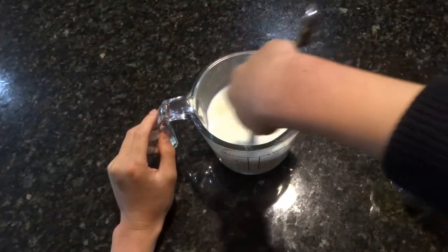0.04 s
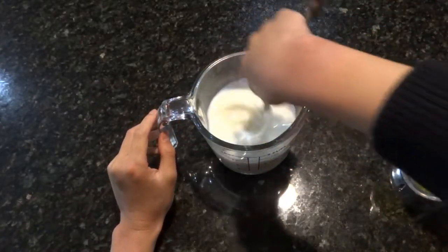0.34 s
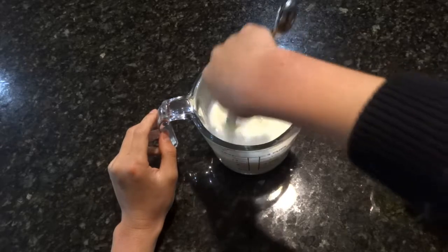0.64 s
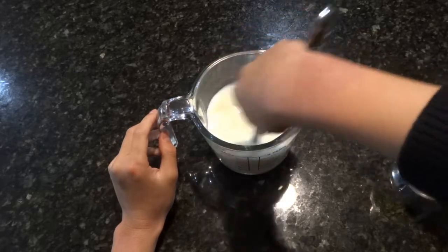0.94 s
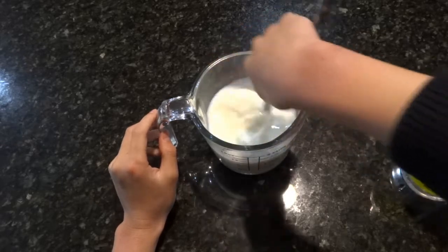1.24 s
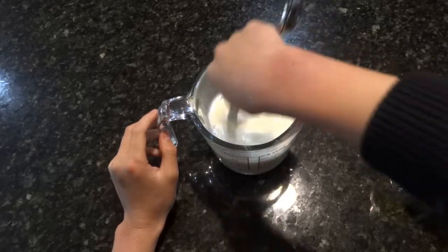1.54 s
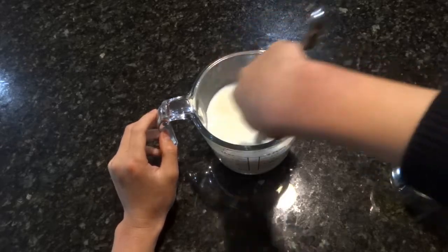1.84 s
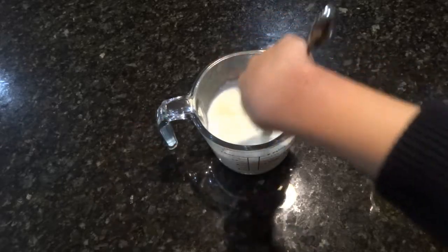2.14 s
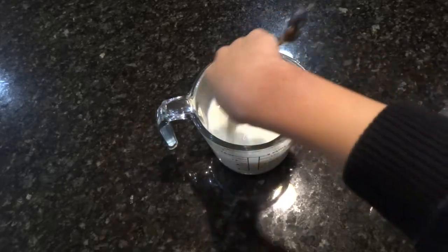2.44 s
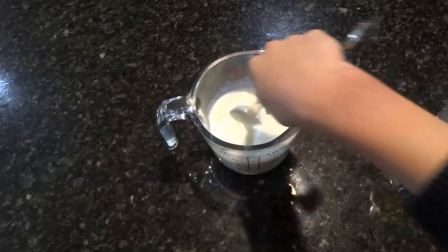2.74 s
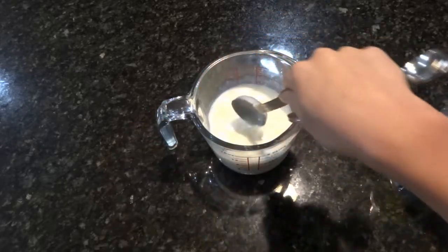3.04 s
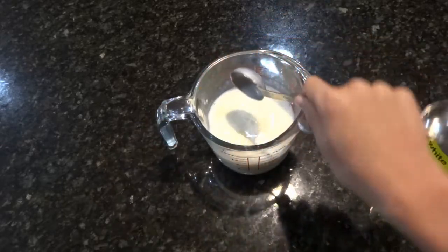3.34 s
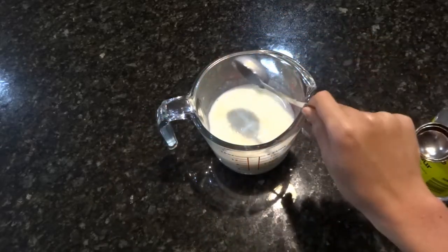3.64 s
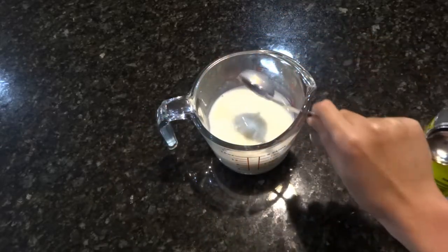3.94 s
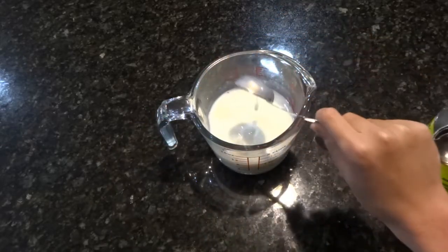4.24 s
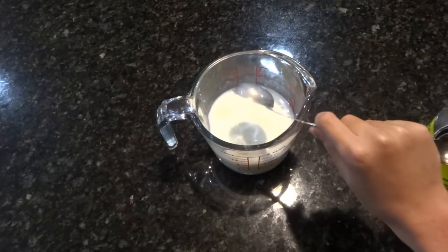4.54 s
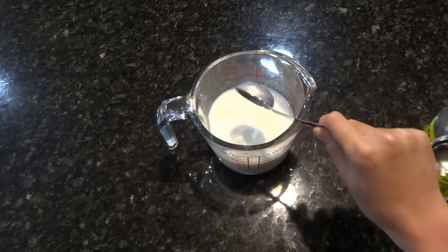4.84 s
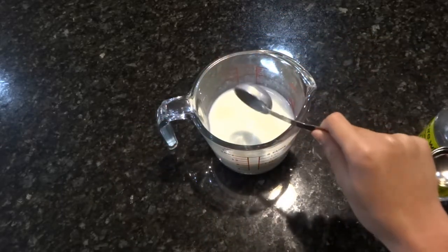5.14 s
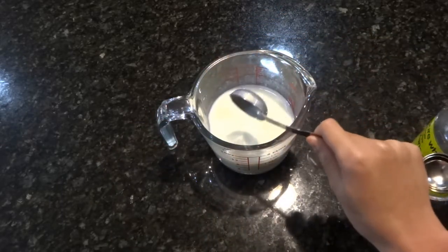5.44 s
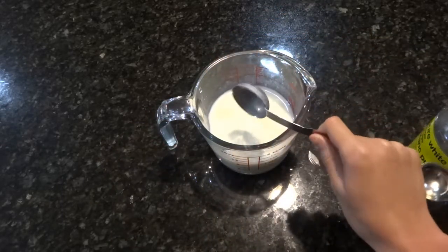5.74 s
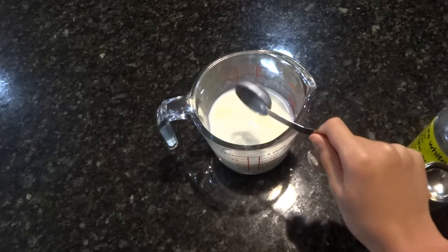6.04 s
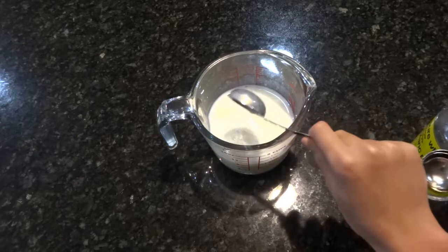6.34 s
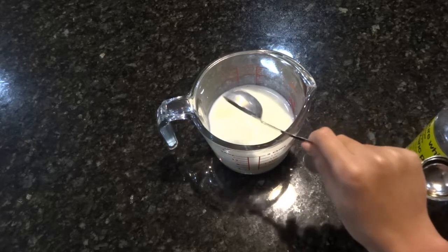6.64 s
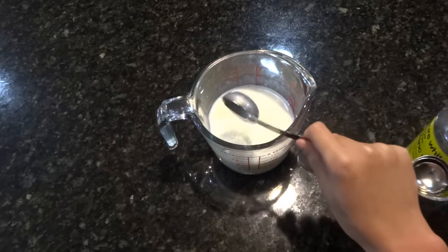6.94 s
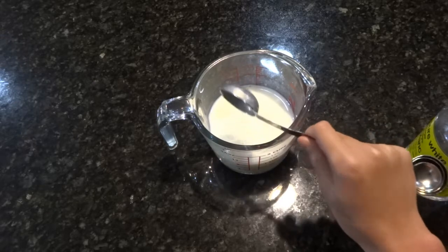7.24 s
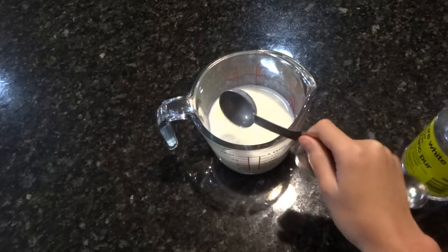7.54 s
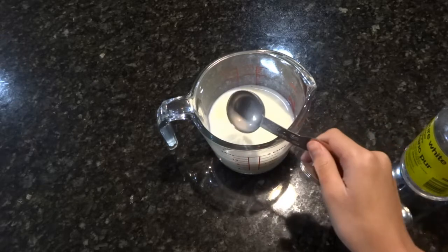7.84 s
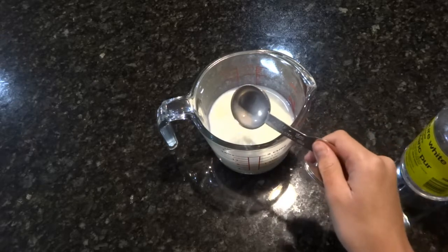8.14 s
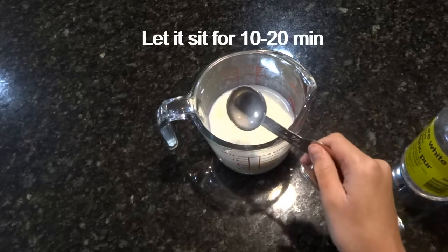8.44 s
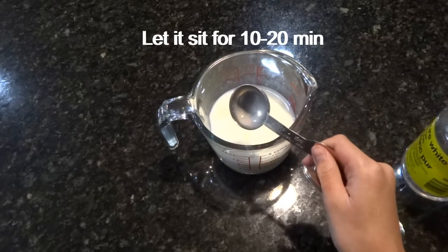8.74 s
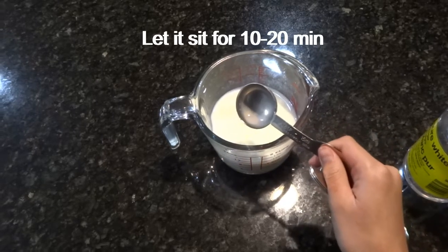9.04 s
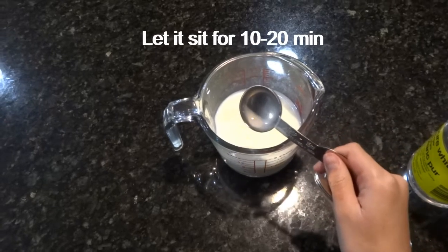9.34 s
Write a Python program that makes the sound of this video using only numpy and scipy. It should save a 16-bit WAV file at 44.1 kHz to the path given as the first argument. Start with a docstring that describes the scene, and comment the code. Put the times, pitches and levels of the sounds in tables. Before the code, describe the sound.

A steel spoon stirs milk in a glass jug, scraping round the wall with clinks, small squeaks and a soft churning of liquid. The stirring stops, and after a short pause the spoon is tapped on the rim about five times a second, each tap a knock with a bright ring. A sleeve rustles faintly and something bumps the counter. The sounds are close, with a short kitchen echo and a faint hum.

```python
"""Stirring milk, tapping the spoon

A steel spoon stirs milk in a glass jug on a stone kitchen counter. Each turn is a sweep, a clink and
a drag back along the wall. Then the spoon is tapped on the rim about five times a second, the point of
contact creeping along it: the steel rings, the jug knocks and the kitchen echoes. A sleeve rustles
and something bumps the counter. A limiter (a fast volume control) flattens the loud blows."""
import sys
import numpy as np
from scipy import signal
from scipy.fft import rfft, irfft
from scipy.io import wavfile
from scipy.ndimage import uniform_filter1d, map_coordinates

SR = 44100
rng = np.random.default_rng(int(sys.argv[2]) if len(sys.argv) > 2 else 0)


def to_wav(s):
    """Save 16-bit WAV."""
    ch = np.atleast_2d(s).T  # columns
    pcm = np.round(np.clip(ch, -1, 1) * 32767)  # PCM
    wavfile.write(sys.argv[1], SR, pcm.astype(np.int16))


N = 418950
T = np.arange(30000) / SR  # seconds since the start of one blow
BLOW_S = .14

# Levels compare the rows of one table. A fade_s is the time taken to die away by 60 dB.
# The kitchen's echo: pitch_hz, fade_s
ECHO_FADE = [(150, 0.98), (700, 0.4), (1200, 0.38), (3000, 0.32), (7000, 0.29), (14000, 0.22)]
# Tone of the room's soft hiss: pitch_hz, level_db
AIR_TONE = [(15, -50), (25, -53.5), (48, -5.5), (97, -12.5), (123, -7.5), (185, 1), (439, -8), (560, -11.5),
            (796, -20), (4610, -27.5), (5880, -36), (6560, -30.5), (8140, -33.5), (13600, -33),
            (16000, -35.5)]
# An appliance hums: pitch_hz, level_db
HUM_NOTES = [(140.0, -61), (242.2, -61), (269.2, -68)]
# A low drone fades: time_s, pitch_hz, level_db
DRONE_PATH = [(0, 76.5, -59), (.65, 71.24, -54.5), (.85, 63.8, -63), (1.2, 57.2, -54), (1.6, 58.1, -58.5),
              (2.401, 57.7, -69.5)]

# The spoon sweeps the bottom, pushing milk ahead of it: start_s, length_s, level_db
SWEEPS = [(0, 0.014, -41), (.345, 0.11, -34), (0.811, 0.087, -33.5), (1.246, 0.11, -35), (1.71, 0.092, -34),
          (2.045, 0.11, -36.5), (2.319, 0.091, -47.5)]
# It drags back along the wall: start_s, length_s, level_db
DRAGS = [(.14, 0.074, -34), (0.593, 0.074, -38), (1.069, .045, -35), (1.47, 0.05, -36.5)]
# Tone of steel scraping glass: pitch_hz, level_db
GRIT_TONE = [(1000, -38), (1800, 3.5), (2600, -12.5), (3600, 10.5), (4400, -1.5), (5800, -6.5),
             (6650, 11.5), (7500, -2.5), (9300, -11.5), (10600, 7.5), (11800, -14.5), (14000, 2),
             (15500, -15)]
# Tone of churning milk: pitch_hz, level_db
CHURN_TONE = [(150, -24.5), (280, -7), (480, -9.5), (630, 2), (760, -5.5), (930, 0), (1300, -5),
              (1800, -9.5), (2600, -11.5), (4000, -40.5)]
# Notes of the glass wall, damped by milk and hand: pitch_hz, level_db, fade_s
WALL_NOTES = [(2990, -12, .1), (3110, -8, .11), (3285, -2, .12), (3597, -1.5, .2), (3960, -12, .12),
              (4280, -8, .14), (4420, -9, .12), (4510, -6, .15), (5375, -13, .16), (6380, -11, .1),
              (8190, -11, .1), (10350, -19, .15)]
# The sunk spoon hits the wall: start_s, level_db, ring_db (compared with the rattle)
CLINKS = [(0.028, -31, 0.5), (.164, -32.5, -8.5), (0.487, -32.5, -1), (.624, -34.5, -8), (0.931, -28, 0.5),
          (1.0663, -32, -8), (1.394, -31.5, 0), (1.51, -34.5, -12), (1.852, -29.5, -12),
          (2.2374, -30.5, -10.5)]
# Tone of a clink's rattle: pitch_hz, level_db
CLINK_TONE = [(100, -17), (450, -11.5), (620, -6.5), (950, 0), (1500, -0.5), (2700, -7.5), (3200, -7),
              (4500, 2.5), (4900, -7.5), (6400, 4.5), (7500, -4), (9000, -5), (13500, -8), (15500, -31)]
# Steel squeaks on glass: start_s, length_s, start_hz, end_hz, level_db, roughness (0-1)
SQUEAKS = [(.13, 0.041, 4000, 4120, -36.5, 0.6), (.135, 0.018, 5200, 4900, -42, .8),
           (.59, 0.03, 3940, 4140, -33.5, 0.5), (.64, 0.047, 4460, 4600, -39, 0.2),
           (.938, 0.056, 3605, 3605, -22, 0), (1.088, 0.023, 4570, 4600, -31, 0.13),
           (1.21, 0.075, 2490, 2810, -36.5, 0.4), (1.478, 0.0246, 4130, 4330, -30.5, 0.8),
           (1.478, .03, 10950, 10550, -32, 1), (1.854, 0.042, 3597, 3625, -22, 0),
           (2.05, 0.024, 4470, 4270, -24, 1), (2.07, 0.13, 3400, 3030, -42.5, 0.8),
           (2.36, 0.048, 4010, 4270, -49, 0.42)]
# The spoon shifts: start_s, level_db, centre_hz
TICKS = [(.225, -43.5, 4900), (1.129, -46.5, 8000), (2.45, -57.5, 3500), (3.844, -57, 450),
         (7.644, -64, 9000), (7.753, -62.5, 7000), (7.819, -56.5, 2600), (7.898, -63.5, 2200),
         (8.419, -61.5, 7000), (9.093, -52, 3500)]
# Tone of such a tick, centred on 1000 Hz: pitch_hz, level_db
SHIFT_TONE = [(150, -7), (500, -2.5), (1000, 1), (3000, -13), (8000, -49.5)]
# Air pockets in the milk: start_s, length_s, start_hz, end_hz, level_db, roughness (0-1)
GULPS = [(.40, 0.048, 1680, 1915, -41.5, 0.35), (.966, 0.023, 1410, 2100, -42, 0.2),
         (1.0, 0.018, 960, 1040, -34, 0), (1.845, 0.062, 964, 998, -26.5, 0.4),
         (2.07, 0.093, 903, 914, -42, 0.47)]

# Taps on the rim: start_s, level_db, place (0-1 along the spoon), bite_db (how sharply its edge lands)
TAPS = [(3.3967, -32.5, 0, -1), (3.885, -27, 0, 3), (4.0805, -22, 0.09, -8.5), (4.268, -22.5, 0.18, 3.5),
        (4.434, -22, 0.08, -2), (4.6158, -21, 0.08, 1.5), (4.785, -29.5, .41, 4),
        (4.9667, -25.5, 0.46, 11.5), (5.162, -26, .39, 9), (5.3059, -30, 0.45, -3),
        (5.4844, -30.5, 0.47, 3), (5.6723, -29.5, .53, -4), (5.87, -31.5, 0.63, -4), (6.0705, -21, .5, 3),
        (6.2776, -19.5, 0.7, -0.5), (6.4864, -19, 0.75, -8.5), (6.6824, -21.5, 0.76, -8.5),
        (6.8979, -21, 0.79, -1), (7.1043, -23, 0.8, 7), (7.2938, -21, 1, 3.5)]
# Notes of spoon and jug, in families that ring together; each note: pitch_hz, level_db, fade_s
RING_FAMILIES = [
    [(2040, -14, .33), (2326, -9, .5), (2475, -9, .3), (2435, -4, .52), (2616, -17, .36), (2930, -16, .45)],
    [(3327, -0.5, .45), (3345, -9, .3), (4281, -10, .38), (5393, -8, .5)],
    [(3594, -9, .3), (3651, -1.5, .5), (3675, -12, .27)],
    [(6444, -13, .2), (6685, -11, .25), (6746, -5, .3), (7424, -9, .25), (7480, -7, .18)],
    [(6132, -10.5, .18), (7014, -8, .24), (7138, -15, .2), (8054, -9, .27), (8748, -18, .28),
     (9426, -17, .2), (9793, -5, .22), (10853, -9, .15)],
    [(9950, -14, .17), (10080, -8, .17), (11243, -4, .18), (12042, -19, .25), (12830, -14, .16),
     (13110, -17, .13)],
]
# How each family answers a tap: level_db, loudest_place, spacing (of loud places along the spoon),
# dip_db (between them), db_per_blow_db, db_per_bite_db
FAMILY_RESPONSE = [(-3, 0.843, .47, 16, .38, 0), (-7, 0.65, 1, 8, 0.25, 0), (-2, 0.21, 1.28, 20, -0.5, 0),
                   (-1.1, 0.5, 1.48, 14, -0.45, 0), (4, 0.99, 1.34, 24.5, -0.72, 0),
                   (-4.5, 1.03, 1.71, 9.5, 1.04, 1)]
# Tone of the jug's dull knock, centred on 1000 Hz: pitch_hz, level_db
KNOCK_TONE = [(60, -38), (240, -17.5), (495, -22), (630, -2.8), (950, -3.5), (1250, 0), (1600, -5.5),
              (2300, -9), (2900, -17), (4200, -19.5), (5600, -28), (6900, -40.5), (9000, -27),
              (14000, -42.5)]
# Notes of the kitchen itself, woken by a knock: pitch_hz, level_db, fade_s
ROOM_NOTES = [(240, -24.5, .6), (712, -12.5, .8), (768, -15, .6), (832, -11, .42), (884, -7, .38),
              (1025, -10, .33), (1102, -14, .3), (1164, -9, .33), (1244, -12, .36)]
# Tone of the bright tick that starts a tap: pitch_hz, level_db
TAP_TONE = [(1000, -11), (2500, -2.5), (3500, -8), (5200, -20), (7000, 10), (8800, 1), (11000, 4),
            (13500, -4), (15500, -16)]

# Sleeve and hand shift: time_s, level_db
RUSTLE_PATH = [(7.45, -59), (7.6, -52.5), (7.8, -54.5), (7.92, -56.5), (8.05, -81)]
# Tone of cloth: pitch_hz, level_db
CLOTH_TONE = [(200, -8), (800, 1.5), (2000, -2.5), (4000, -12), (10000, -12.5), (15000, -22.5)]
# Tone of the bump on the counter: pitch_hz, level_db
BUMP_TONE = [(30, -11), (70, -3), (300, -1), (550, -3.5), (850, -5.5), (1400, -12), (2200, -3), (2800, -19),
             (4000, -15), (6000, -42)]
# Boost or cut of the difference between left and right: pitch_hz, gain_db
STEREO_WIDTH = [(30, -8.5), (125, -8), (300, -2.5), (700, 7), (3000, 5.5), (8000, 0.5), (12000, -10.5)]

STIR_END_S, SETTLE_S = 2.36, .1  # the stirring stops, then the milk settles


def amp(db):
    """Turns decibels into a multiplier."""
    return 10 ** (np.asarray(db) / 20)


def unit(x):
    """Scales a sound to an average power of 1."""
    return x / np.sqrt(np.mean(abs(x) ** 2) + 1e-20)


def blow(x):
    """Gives a short sound the energy of power 1 held for BLOW_S."""
    return unit(x) * np.sqrt(BLOW_S * SR / x.shape[-1])


def look_up(points, hz):
    """Reads a table's value at any pitch, filling in between its rows."""
    pitch_hz, value = np.transpose(points)
    return np.interp(np.log(hz + 1), np.log(pitch_hz + 1), value)


def add(mix, start_s, sound):
    """Mixes a sound in at the given time."""
    part = mix[..., round(start_s * SR):][..., :sound.shape[-1]]
    part += sound[..., :part.shape[-1]]


def convolve(x, response):
    """Passes a sound through an echo or filter, keeping its length."""
    return signal.fftconvolve(np.atleast_2d(x), np.atleast_2d(response), axes=1)[:, :x.shape[-1]]


def colour(x, tone, shift=1, size=2048):
    """Filters a sound by a tone table whose pitches are multiplied by shift."""
    log_gain = np.log(amp(look_up(tone, abs(np.fft.fftfreq(size, 1 / SR)) / shift)))
    spectrum = np.exp(np.conj(signal.hilbert(log_gain)))  # nothing rings ahead of the sound
    return convolve(x, np.fft.ifft(spectrum).real[:size // 2])


def wander(size, hz):
    """A smooth random wobble, up to about hz times a second."""
    rolloff = 1 + (np.fft.rfftfreq(size, 1 / SR) / hz) ** 4
    return unit(irfft(rfft(rng.standard_normal(size)) / rolloff, size))


def contact(decay_s):
    """Hard surfaces chatter briefly when they meet."""
    return rng.choice([-1., 1.], len(T)) * np.exp(-T / decay_s)


def kitchen(echo_db, early=.91, ceiling_s=.018, side=.16):
    """A click in the room: direct sound, weaker early echoes, then a wash from ceiling and walls."""
    mid, apart = rng.standard_normal((2, len(T)))
    hz, t, spectra = signal.stft([mid + side * apart, mid - side * apart], SR, nperseg=256)
    fade = amp(-60 * t / look_up(ECHO_FADE, hz)[:, None])
    echo = signal.istft(spectra * fade, SR, nperseg=256)[1][:, :len(T)]
    echo *= np.where(T < ceiling_s, early, 1) * (T > .002)
    echo *= amp(echo_db) / np.linalg.norm(echo[0])
    echo[:, 0] += 1
    return echo


def room_tone(air_db=-54.5, side=.4, hum_db=-3):
    """Soft air noise, an appliance's hum and a fading low drone."""
    t = np.arange(N) / SR
    mid, apart = unit(colour(rng.standard_normal((2, N)), AIR_TONE, size=8192))
    air = amp(air_db) * np.array([mid + side * apart, mid - side * apart])
    hum = sum(amp(db + hum_db) * np.sin(2 * np.pi * hz * t + .23 * wander(N, hz=3.2))
              for hz, db in HUM_NOTES)
    s, hz, db = np.transpose(DRONE_PATH)
    phase = 2 * np.pi * np.cumsum(np.interp(t, s, hz)) / SR
    drone = amp(np.interp(t, s, db)) * np.sin(phase + .5 * wander(N, hz=6))
    return air + np.sqrt(2) * (hum + drone)


def swell(start_s, length_s, rise_s, fall_s):
    """Loudness of one movement: it rises up to start_s, holds, then dies away."""
    t = np.arange(N) / SR - start_s
    return np.exp(-(np.minimum(t, 0) / rise_s) ** 2 - np.maximum(t - length_s, 0) / fall_s)


def stir_levels(glide_db=-59, swirl_db=-53.5, push_db=-4.5, drag_push_db=-13, graze_db=-15, slosh_db=-12):
    """How strongly the spoon scrapes and the milk churns at each moment."""
    circling = swell(0, STIR_END_S, rise_s=.01, fall_s=SETTLE_S)  # both go on between strokes
    scrape, churn = amp(glide_db) * circling, amp(swirl_db) * circling
    for s, length_s, db in SWEEPS:
        scrape = np.hypot(scrape, amp(db) * swell(s, length_s, rise_s=.039, fall_s=.014))
        churn = np.hypot(churn, amp(db + push_db) * swell(s, .028, rise_s=.021, fall_s=.045))
    for s, length_s, db in DRAGS:
        drag = amp(db) * swell(s, length_s, rise_s=.036, fall_s=.009)
        scrape, churn = np.hypot(scrape, drag), np.hypot(churn, amp(drag_push_db) * drag)
    for s, db, _ in CLINKS:  # after a clink the spoon grazes on and the milk sloshes
        after = amp(db) * swell(s, .042, rise_s=.004, fall_s=.025)
        scrape, churn = np.hypot(scrape, amp(graze_db) * after), np.hypot(churn, amp(slosh_db) * after)
    return scrape, churn


def chirps(per_s=1100, typical_s=.011, glide=.031):
    """The dragged edge catches and sings in a swarm of tiny gliding tones."""
    out, end_s = np.zeros(N), STIR_END_S + SETTLE_S
    for when, pitch, length, slope, softness in rng.random((int(per_s * end_s), 5)):
        size = int(SR * typical_s * (.13 + 1.65 * length))
        hz = (2000 + 13000 * pitch) * (1 + glide * (2 * slope - 1) * np.linspace(-1, 1, size))
        chirp = np.hanning(size) * np.sin(2 * np.pi * np.cumsum(hz) / SR)
        add(out, when * end_s, amp(-np.log(.033 + softness)) * chirp)
    return unit(out * amp(2.5 * wander(N, hz=70)))  # the catches come in clumps


def dipping(x, turn_s=.456, shallowest_s=.235, bend=.028):
    """The pitch sags and rises once a turn, as the milk weighs on the spoon more and less."""
    t = np.arange(N) / SR
    ahead_s = bend * turn_s / (2 * np.pi) * np.sin(2 * np.pi * (t - shallowest_s) / turn_s)
    return map_coordinates(np.ravel(x), [(t + ahead_s) * SR], order=5)


def stirring(grit_db=-3, chirp_db=1, wall_db=-7, slips_per_s=5000):
    """The spoon's edge scrapes in tiny slips that make the wall ring; the milk churns in lumps."""
    scraping, churning = stir_levels()
    slips = rng.choice([-1., 1.], N) * (rng.random(N) < slips_per_s / SR)
    slips *= amp(3 * np.minimum(rng.exponential(1, N), 4))  # a few are much stronger
    slips *= amp(3.6 * wander(N, hz=45))
    wall = sum(amp(db - 60 * T / fade_s) * np.sin(2 * np.pi * hz * T) for hz, db, fade_s in WALL_NOTES)
    singing = unit(colour(chirps(), GRIT_TONE)) * np.sqrt((STIR_END_S + SETTLE_S) * SR / N)
    grit = dipping(unit(colour(slips, GRIT_TONE)) + amp(chirp_db) * singing)
    grit = grit + amp(wall_db) * unit(convolve(slips, wall))
    lumps = rng.standard_normal(N) * amp(2.2 * wander(N, hz=58.4))
    milk = unit(colour(lumps, CHURN_TONE))
    return convolve(amp(grit_db) * scraping * grit + churning * milk, kitchen(echo_db=-8))


def ringing(notes, room, touch_db=2, touch_s=.035):
    """Each note as heard in the room: it dies fast while the spoon still touches, then rings free."""
    touching = 1 + amp(touch_db) * np.exp(-T / touch_s)
    tones = []
    for hz, db, fade_s in notes:
        tone = np.exp(2j * np.pi * hz * T) * amp(-60 * T / fade_s) * touching
        tones.append((hz, amp(db) * blow(convolve(tone, room))))
    return tones


def strike(tones, detune_hz, spread_db=2, buzz=0, buzz_width=.02, buzz_s=.052):
    """Each hit sounds the notes a little differently; steel chattering on glass can add a buzz."""
    out = 0
    for hz, tone in tones:
        turns = rng.random() + detune_hz * rng.normal() * T
        jitter = rng.standard_normal(600) + 1j * rng.standard_normal(600)
        chatter = np.interp(T * 2 * buzz_width * hz, np.arange(len(jitter)), jitter) * np.exp(-T / buzz_s)
        note = tone * np.exp(2j * np.pi * turns) * (1 + buzz * chatter)
        out = out + amp(spread_db * rng.normal()) * note.real
    return np.sqrt(2) * out


def clinks():
    """The sunk spoon strikes the wall: a sharp edge, a bright rattle and a short ring."""
    out, room = np.zeros((2, N)), kitchen(echo_db=-6.5)
    wall = ringing(WALL_NOTES, room, touch_db=4)
    for s, db, ring_db in CLINKS:
        hit = contact(decay_s=.014) + 2.2 * contact(decay_s=.00082)
        rattle = blow(convolve(colour(hit, CLINK_TONE), room))
        ring = strike(wall, detune_hz=10, buzz=.42, buzz_width=.006)
        add(out, s, amp(db) * (rattle + amp(ring_db) * ring))
    return out


def glides(rows, flutter_hz, overtone_db):
    """Short sliding tones, roughened by a random flutter."""
    out = np.zeros(N)
    for s, length_s, start_hz, end_hz, db, rough in rows:
        size = int(length_s * SR)
        phase = 2 * np.pi * np.cumsum(np.linspace(start_hz, end_hz, size)) / SR
        flutter = 1 - rough + rough * (wander(size, flutter_hz) + 1j * wander(size, flutter_hz))
        tone = (flutter * (np.exp(1j * phase) + amp(overtone_db) * np.exp(2j * phase))).real
        add(out, s, amp(db) * unit(tone * signal.windows.tukey(size, .6)))
    return convolve(out, kitchen(echo_db=-15))


def squeaks():
    """Steel sticks and slips on glass fast enough to make a note."""
    return glides(SQUEAKS, flutter_hz=330, overtone_db=-27)


def spoon_ticks():
    """The spoon ticks faintly as it shifts."""
    out = np.zeros((2, N))
    for s, db, hz in TICKS:
        tick = colour(contact(decay_s=.0018), SHIFT_TONE, hz / 1000)
        add(out, s, amp(db) * blow(convolve(tick, kitchen(echo_db=-13))))
    return out


def gulps():
    """Pockets of air ring in the milk, rising in pitch."""
    return glides(GULPS, flutter_hz=50, overtone_db=-25)


def family_levels(hard_db, place, bite_db):
    """Each family's level in dB depends on where, how hard and how sharply the spoon lands."""
    db, loudest_place, spacing, dip_db, by_blow, by_bite = np.transpose(FAMILY_RESPONSE)
    miss = np.sin(np.pi * (place - loudest_place) / spacing) ** 2
    return db - dip_db * miss + by_blow * hard_db + by_bite * bite_db


def clonk(hz, decay_s):
    """A hollow note that is gone within a few swings."""
    return np.sin(2 * np.pi * hz * T) * T * np.exp(-T / decay_s)


def rebounds(knock_hz, gap_s=.018, loss_db=4, count=3):
    """The jug drops back on the counter a few times, mostly lower than the knock and ever weaker."""
    out = np.zeros(len(T))
    for k, (late, pitch, strength) in enumerate(rng.standard_normal((count, 3))):
        start_s = gap_s * (k + 1) * (1 + .1014 * np.clip(late, -2, 2))
        bounce = clonk(knock_hz * (.893 + .08 * pitch), decay_s=.0022)
        add(out, start_s, amp(2 * strength - loss_db * k) * bounce)
    return blow(out)


def rim_taps(knock_db=-3, ring_db=-4, boom_db=-4, tick_db=-32, clonk_db=-29, rebound_db=-6):
    """Each tap ticks and clonks, rocks the jug, wakes the room's notes and sets the steel ringing."""
    out, room = np.zeros((2, N)), kitchen(echo_db=-7.5)
    families = [ringing(notes, room) for notes in RING_FAMILIES]
    room_notes = ringing(ROOM_NOTES, kitchen(echo_db=-26), touch_db=-7.5)
    for s, db, place, bite_db in TAPS:
        hard_db, force_db = db + 25, db + 18.5  # compared with a usual blow and with the hardest ones
        knock_hz = 1035 * 2 ** (-.044 * hard_db)  # harder blows knock lower
        rocking = 1 - np.exp(-T / (.0038 * amp(.9 * force_db)))  # and rock the jug longer
        knock = blow(colour(kitchen(echo_db=20, early=.94) * rocking, KNOCK_TONE, knock_hz / 1000))
        tick = blow(convolve(colour(contact(decay_s=.01), TAP_TONE), room))
        ring = sum(amp(level_db) * strike(tones, detune_hz=6.5, buzz=.78, buzz_width=.016, buzz_s=.061)
                   for level_db, tones in zip(family_levels(hard_db, place, bite_db), families))
        boom = amp(boom_db + .32 * force_db) * strike(room_notes, detune_hz=.42, spread_db=3.5)
        body = amp(knock_db) * knock + boom + amp(rebound_db) * rebounds(knock_hz)
        attack = amp(clonk_db) * blow(clonk(knock_hz, decay_s=.003)) + amp(tick_db) * tick
        attack *= amp(.56 * force_db)  # only partly follows the force, so light taps stay crisp
        add(out, s, amp(db) * (body + amp(ring_db) * ring) + attack)
    return out


def rustle():
    """A soft, uneven brush of cloth as the arm relaxes."""
    s, db = np.transpose(RUSTLE_PATH)
    cloth = colour(rng.standard_normal(N) * amp(3 * wander(N, hz=48)), CLOTH_TONE)
    return unit(cloth) * amp(np.interp(np.arange(N) / SR, s, db, left=-120, right=-120))


def counter_bump(start_s=9.249, level_db=-41.5):
    """A soft bump against the counter echoes round the kitchen."""
    out = np.zeros((2, N))
    thud = colour(contact(decay_s=.011), BUMP_TONE)
    add(out, start_s, amp(level_db) * blow(convolve(thud, kitchen(echo_db=-2))))
    return out


def scene(low_cut_hz=70):
    """Mixes it all. The jug, too small to give out bass, stands slightly right of centre."""
    jug = rim_taps() + clinks() + stirring() + squeaks() + gulps()
    jug = signal.sosfilt(signal.butter(2, low_cut_hz, "highpass", fs=SR, output="sos"), jug)
    nearby = jug + spoon_ticks() + counter_bump() + rustle()
    left, right = nearby * amp([[-.25], [.25]]) + room_tone()
    side = colour((left - right) / 2, STEREO_WIDTH)
    return (left + right) / 2 + np.array([[1], [-1]]) * side


def record(dry, limit_db=-15, recovery_db_per_s=170, squeeze=.91, peak=.62, top_hz=15900):
    """A fast limiter turns loud blows down and lets the room swell back; the highest treble is cut."""
    power_db = 10 * np.log10(abs(uniform_filter1d((dry ** 2).mean(0), size=160)) + 1e-12)
    recovery_db = np.arange(N) / SR * recovery_db_per_s
    recent_peak_db = np.maximum.accumulate(power_db + recovery_db) - recovery_db
    over_db = np.maximum(recent_peak_db - limit_db, 0)
    held = dry / amp(squeeze * uniform_filter1d(over_db, size=60))
    held = peak * np.tanh(held / peak)  # rounds off the fastest peaks
    treble_cut = signal.firwin(255, top_hz, window=("kaiser", 9), fs=SR)
    return signal.oaconvolve(held, treble_cut[None], "same")


dry = scene()
out = record(dry)
to_wav(out)
```